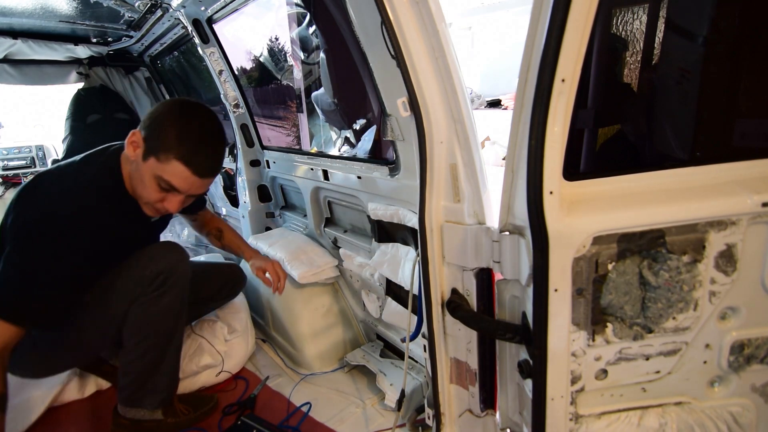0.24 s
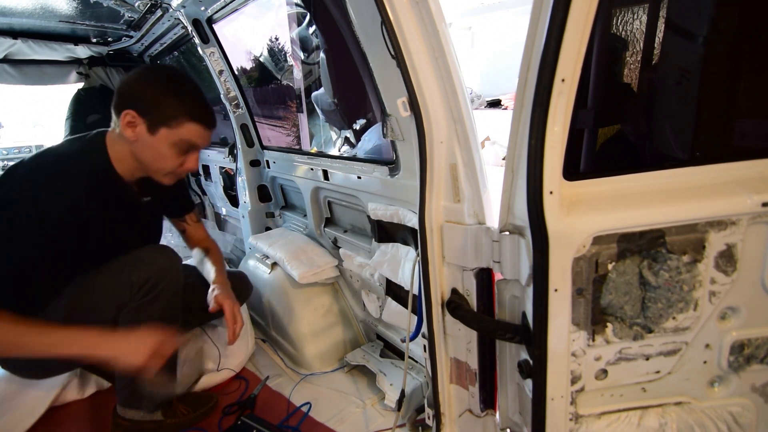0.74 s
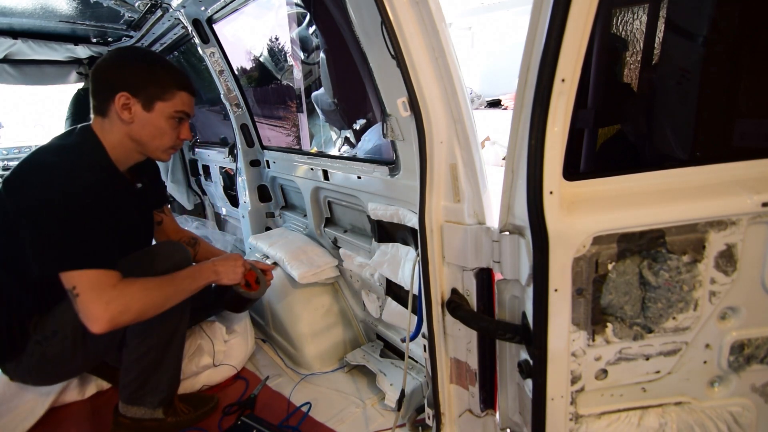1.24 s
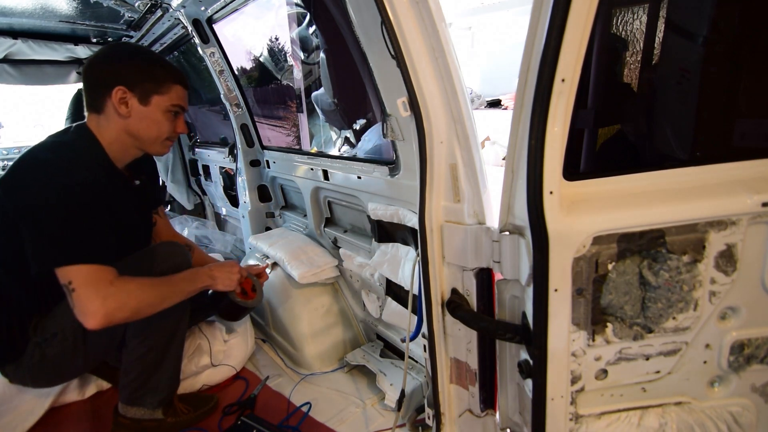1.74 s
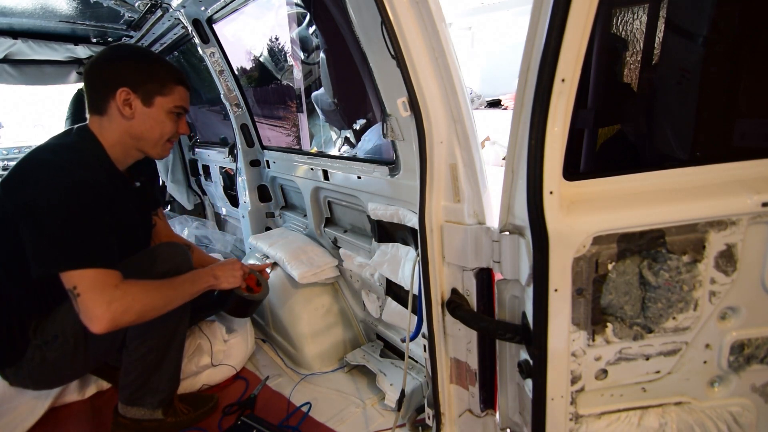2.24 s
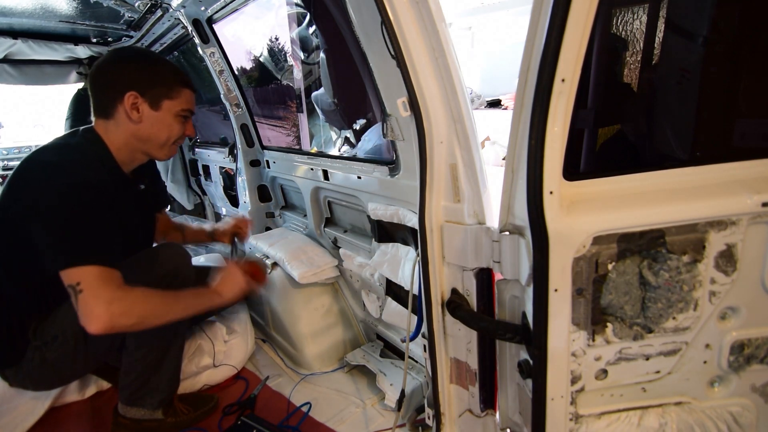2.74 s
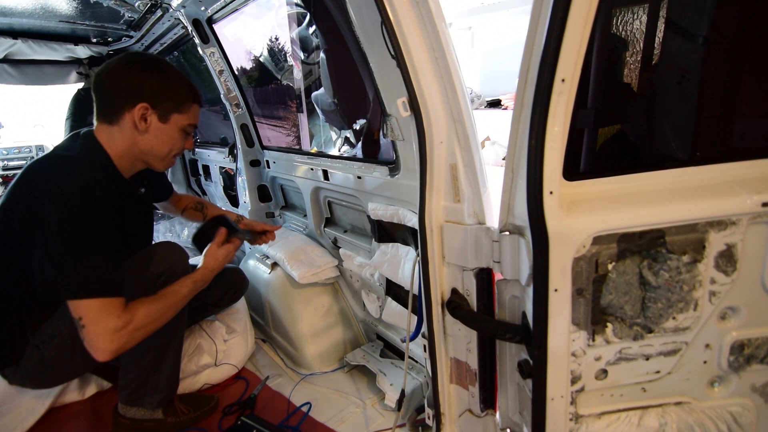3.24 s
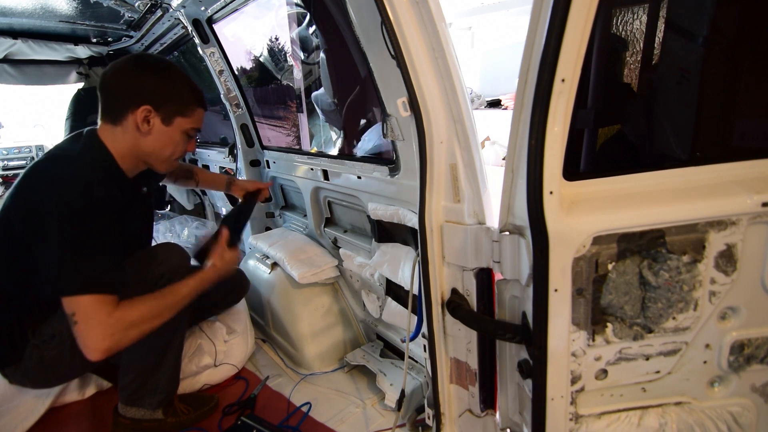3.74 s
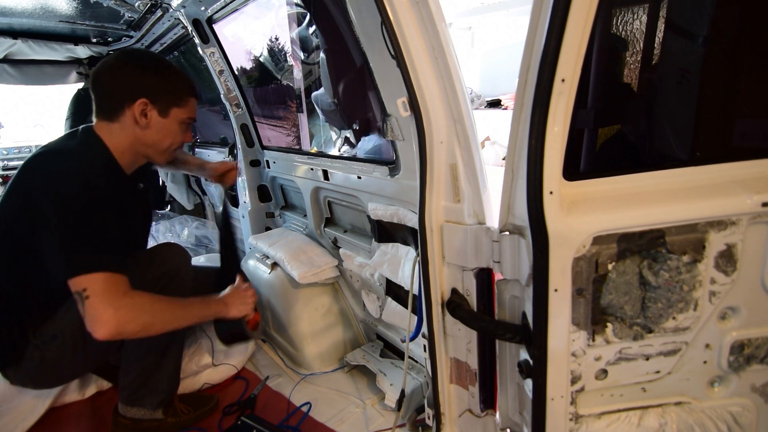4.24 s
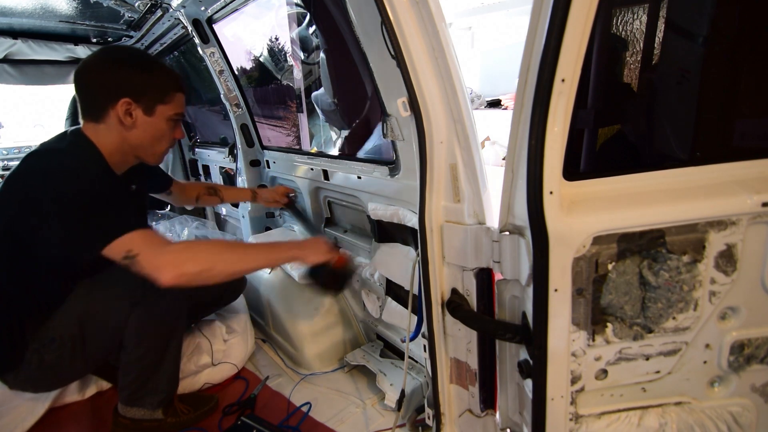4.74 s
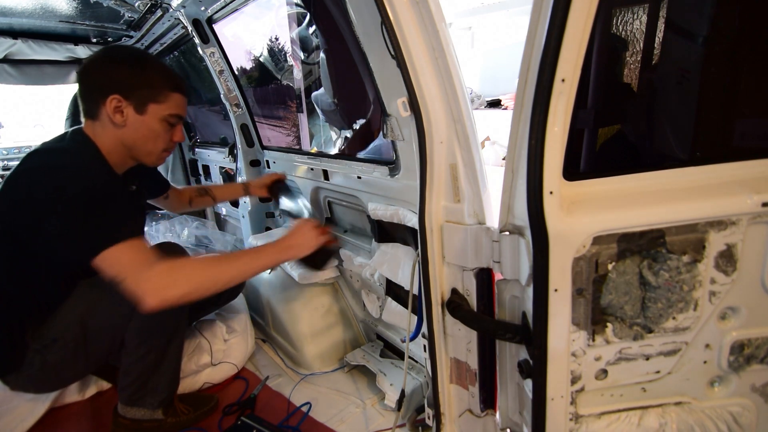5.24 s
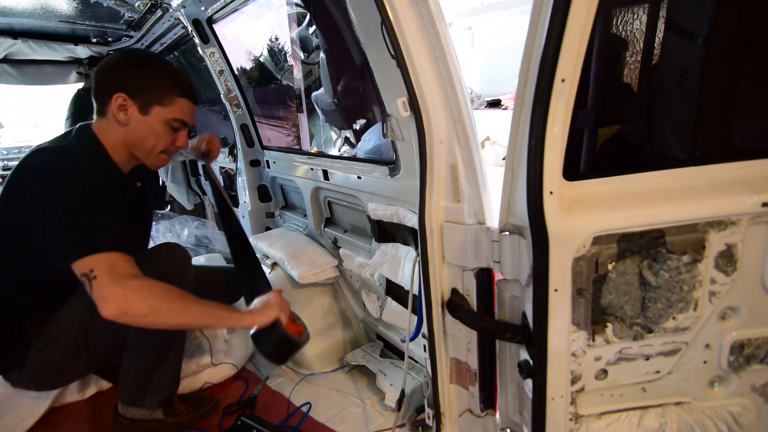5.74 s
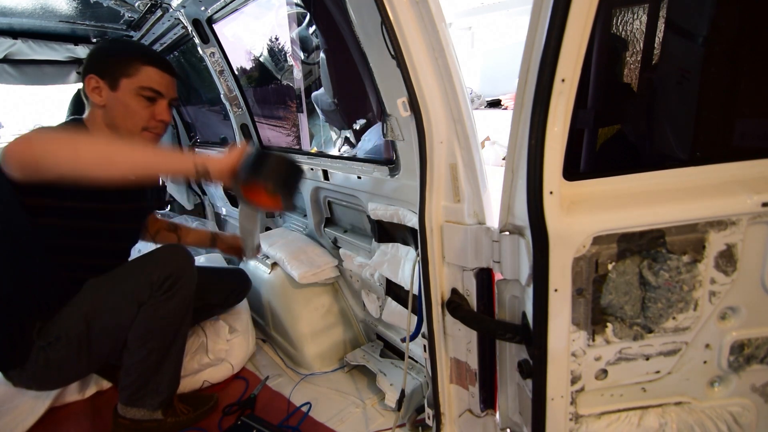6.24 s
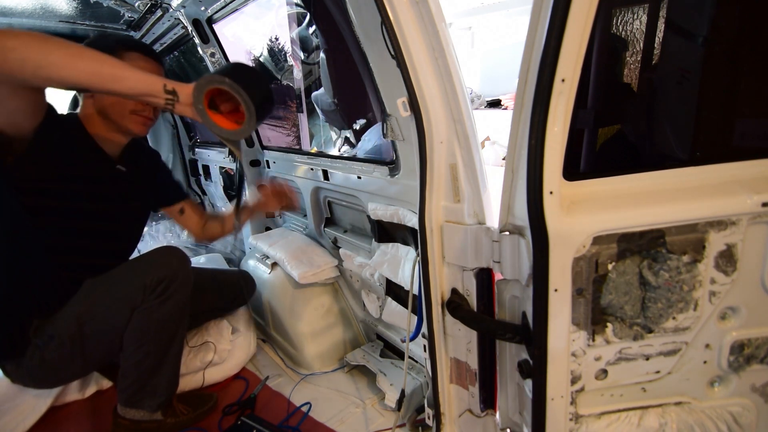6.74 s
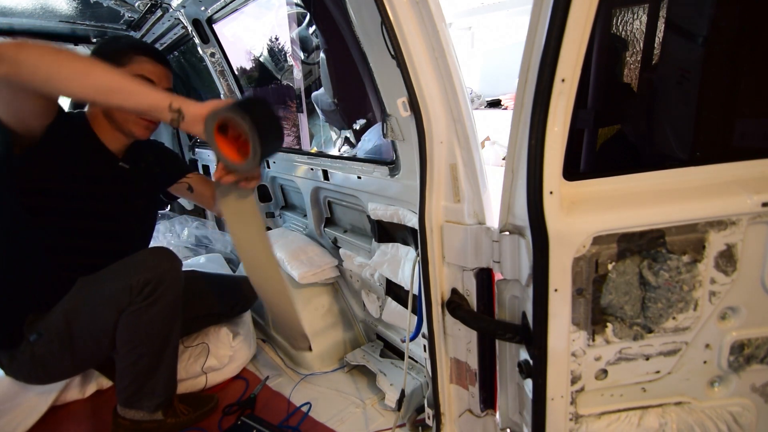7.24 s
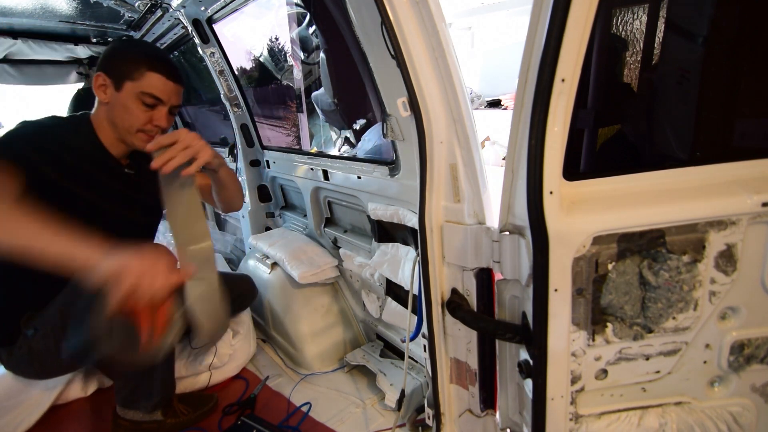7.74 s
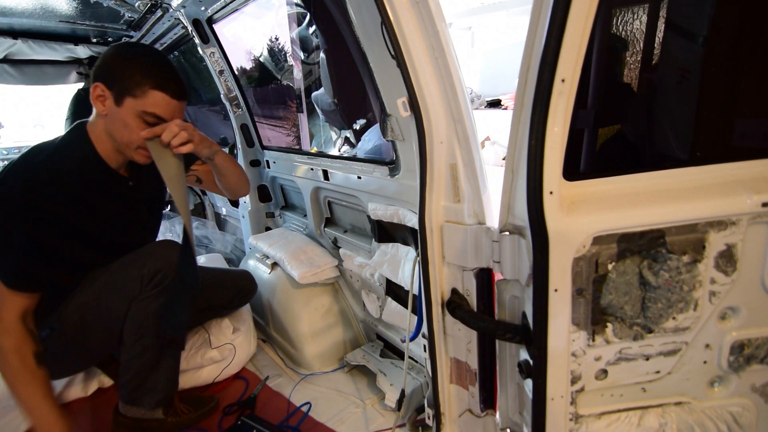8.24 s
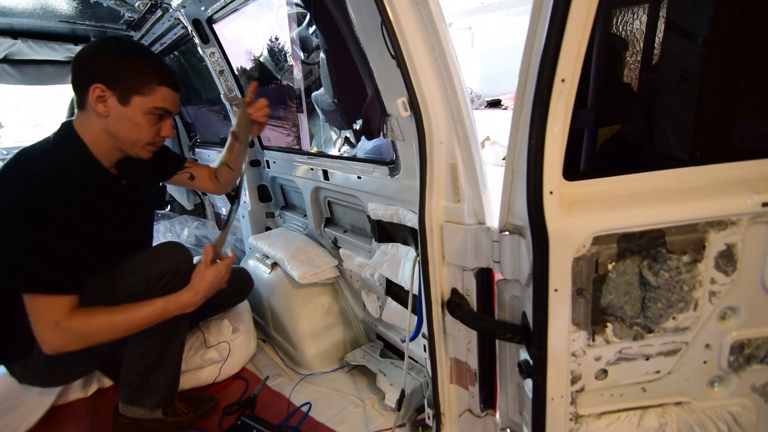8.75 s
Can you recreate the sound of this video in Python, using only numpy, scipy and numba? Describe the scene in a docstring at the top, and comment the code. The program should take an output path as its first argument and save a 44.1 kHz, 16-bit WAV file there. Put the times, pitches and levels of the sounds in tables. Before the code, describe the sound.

Quiet low rumble and hum, slight bare-shell ring. Small dry picking clicks come first, then a loud snap of tape. Brief bursts of peeling adhesive follow, each ending in a loose flutter, with sharp cracks and grainy hand sliding between. A short coarse rip cuts the strip. Right after, several quick damped metallic thuds from the dropped roll, and more crinkling. Heard close up, in stereo.

```python
"""A stripped van with a motor humming faintly nearby: feet and hands stir, then a nail picks at a roll of duct tape.
From 2.7 s four jerky tugs pull off a strip: glue snaps in a crackle, the taut strip squawks, then flaps slack.
Between tugs it crinkles in sharp cracks with a brief flutter, and sliding hands add grainy hiss and a dull rub.
At 7.6 s the strip is ripped across, thread after thread. From 8.2 s the dropped roll bounces on the sheet-metal
floor in damped notes, clacks and panel rattle, and the tape crinkles on. The bare shell rings on faintly."""
import sys
import numpy as np
from scipy import signal
from scipy.fft import rfft, irfft, next_fast_len
from scipy.io import wavfile
from scipy.ndimage import uniform_filter1d
from numba import njit

SR = 44100
rng = np.random.default_rng(int(sys.argv[2]) if len(sys.argv) > 2 else 0)


def store_wav(level_fs):
    """Save 16-bit WAV to argv[1]."""
    pcm = np.round(np.clip(np.atleast_2d(level_fs), -1, 1) * 32767)
    wavfile.write(sys.argv[1], SR, pcm.T.astype(np.int16))


N = 396018
T = np.arange(N) / SR   # time axis [s]

# All levels are relative settings; spectra shape the tone.
# low rumble of the background: (frequency [Hz], density [dB per Hz])
RUMBLE_SPECTRUM = [(15, -45), (25, -14), (87, -11.5), (102, -18.5), (123, -6.5), (149, -20), (249, -26),
                   (363, -18.5), (641, -22.5), (796, -24.5), (1070, -27), (1290, -32), (1440, -29),
                   (2760, -41.5), (16000, -43.5)]
RUMBLE_DB, HUM_DB, HUM_HZ = -56.5, -54.5, 118.5
# likeness of left and right in a diffuse field: (frequency [Hz], correlation [-1 to 1])
STEREO_LIKENESS = [(60, .975), (300, .985), (640, .95), (1400, .75), (3100, 0), (7000, -.15), (15000, -.4)]
# reflections of the whole shell, and of panels close by: (frequency [Hz], density [dB per Hz])
SHELL_SPECTRUM = [(100, 9.5), (600, 2), (1600, 5.0), (3000, 7.5), (7000, -2.5), (16000, 0.5)]
PANEL_SPECTRUM = [(100, 1.5), (700, -2.0), (2000, 0), (5000, 0.5), (16000, 1.5)]
# hands and tape sliding: (time [s], half length [s], hiss level [dB], rub level [dB])
SLIDES = [(0.397, 0.16, -66, -69), (1.989, 0.053, -63.5, -68), (2.487, 0.078, -61, -83),
          (2.687, 0.083, -57, -60.5), (2.96, 0.22, -67.5, -60.5), (3.107, 0.021, -44, -46.5),
          (3.201, 0.06, -57, -74), (3.814, 0.16, -59, -67), (4.43, 0.085, -55.5, -63.5),
          (5.233, 0.054, -62, -73), (6.006, 0.14, -62, -66.5), (6.298, 0.086, -64, -55),
          (6.543, 0.2, -63.5, -59.5), (7.927, .025, -57, -52.5), (8.61, 0.1, -61, -56),
          (8.943, 0.089, -58.5, -61)]
# bright grain of a slide: (frequency [Hz], density [dB per Hz])
HISS_SPECTRUM = [(2000, -18), (3500, -5), (6000, -1), (10000, 0), (14000, 0), (16000, -2)]
# dull body of a slide: (frequency [Hz], density [dB per Hz])
RUB_SPECTRUM = [(200, -14), (400, -3), (950, 0), (1600, -3), (2300, -11), (3200, -22), (16000, -50)]
# soft taps of hand and roll: (time [s], level [dB], pitch [Hz])
TAPS = [(0.335, -45.5, 340), (4.053, -34, 874), (4.637, -38.5, 514), (6.119, -38, 256), (6.155, -35, 258),
        (6.211, -31.5, 285), (7.386, -37.5, 228)]
# blows on the floor, shifting feet then the bouncing roll: (time [s], level [dB], note [Hz], note t60 [s])
FLOOR_BLOWS = [(0.335, -38, 133, 0.19), (4.971, -44.5, 91, 0.27), (5.021, -54, 39, 0.29),
               (8.192, -13.5, 280, 0.057), (8.265, -11.5, 330, 0.055), (8.3135, -6.5, 406, 0.032),
               (8.343, -21.5, 431, 0.16), (8.405, -10.5, 339, 0.075)]
# low resonances of the floor: (frequency [Hz], level [dB], t60 before the load damps it [s])
FLOOR_MODES = [(142.6, 3.5, 0.83), (206, -2.5, 0.65), (246, -6.5, 0.74), (326, 1.5, 0.64), (449, -9, 0.3),
               (534, -6.5, 0.39), (603, -0.5, 0.18), (728, -25, 0.33), (913, -18, 0.56), (984, -13, 0.38),
               (1070, -30, 0.21), (1112, -10, 0.26), (1244, -23, 0.46), (1970, -33, 0.12)]
# panel rattle after a blow: (frequency [Hz], density [dB per Hz])
RATTLE_SPECTRUM = [(24, -53), (40, -22), (126, -3), (172, -19), (335, -6.5), (415, -5), (446, -10),
                   (593, -15), (653, -9), (771, -20.5), (1030, -23.5), (1960, -40.5), (3230, -50),
                   (5860, -55), (12000, -49), (15600, -69), (22000, -120)]
# brief clack of a blow: (frequency [Hz], density [dB per Hz])
CLACK_SPECTRUM = [(200, -11), (450, -4), (700, 2.5), (1200, -11.5), (2000, -27), (4000, -44), (16000, -52)]
# panels buzzing under a hard blow: (frequency [Hz], density [dB per Hz])
BUZZ_SPECTRUM = [(600, -27), (1800, 4), (3000, -2), (6000, -5), (11000, 2), (16000, -10)]
# a nail picks at the end of the tape: (time [s], level [dB])
PICKS = [(1.1285, -41.5), (1.268, -37), (1.348, -44), (1.5823, -33.5), (1.6944, -35.5), (1.9634, -39.5),
         (2.0052, -34.5), (2.4687, -35), (2.6726, -30.5)]
# tone of a pick: (frequency [Hz], level [dB])
PICK_SPECTRUM = [(100, -30), (2300, -30), (3500, 5), (5000, -3), (7500, 1.5), (11000, 3), (16000, -13)]
# the loudest creases popping in the tape: (time [s], level [dB], tilt [dB per octave])
CREASES = [(0.4558, -22.5, -2.2), (1.7485, -3, 2.1), (3.0412, -4.5, 0.1), (3.1159, -5.5, -4),
           (3.5408, -19.5, 1.5), (3.6516, -22, -1.5), (3.8137, -3, 2.5), (3.8185, -7, 2),
           (4.3078, -24.5, 1), (4.348, -20.5, 1), (4.4351, -10.5, -0.5), (4.5596, -15, 4),
           (4.6349, -29, -4), (4.9182, -31, -4.5), (5.789, -17.5, -3), (5.8654, -18.5, 0),
           (5.9353, -16.5, 1), (5.9566, -15, 1.5), (5.9717, -14.5, -1), (6.0252, -17.5, -.5),
           (6.0474, -16, 1), (6.0865, -15, 1.2), (6.2801, -17.5, -0.5), (6.346, -11, 0.5),
           (6.513, -7, -1.5), (7.2053, -16.5, -2), (7.435, -27, -3.5), (7.954, -17, -3),
           (8.2228, -17.5, -1.5), (8.4326, -6, -0.5), (8.545, -9, -2.2), (8.5934, -20, -5),
           (8.7711, -15.5, -1), (8.923, -9.5, -2)]
# tone of a crease: (frequency [Hz], level [dB])
CREASE_SPECTRUM = [(100, -4), (350, 5.5), (900, 5), (1800, 5), (3200, -1), (6000, 0.5), (10500, -0.5),
                   (16000, -7.5)]
# sudden slips of the peel or tear line: (time [s], level [dB], tilt [dB per octave])
SLIPS = [(2.7345, -0.5, 2), (2.743, 3.5, -1), (2.749, 3.5, -3.5), (2.789, -4.5, 3), (3.413, -9, 1.7),
         (3.422, -8.5, 1.5), (3.489, -2, -5), (4.090, -3, 0.5), (5.701, 2.5, -0.9), (7.5585, -3.5, 5),
         (7.571, -8, 0), (7.585, 1, 0), (7.591, 2.5, -5.5), (7.607, -2, 2)]
# tone of a slip: (frequency [Hz], level [dB])
SLIP_SPECTRUM = [(30, -30), (100, -12), (350, -0.5), (900, 2.5), (1600, 4.5), (3200, -1.5), (6000, 1),
                 (10500, -2), (16000, -7)]
TILT_PIVOT_HZ = 3500   # a tilt leaves the level here alone
# the slackened strip flaps: (time [s], level [dB], starting ripple pitch [Hz], thud pitch [Hz], t60 [s])
FLAPS = [(2.815, -24, 251, 144, 0.055), (3.425, -20, 370, 159, 0.052), (3.490, -19, 313, 93, 0.15),
         (4.152, -18.5, 400, 300, 0.05), (4.165, -20.5, 320, 92.5, 0.097), (5.745, -19.5, 129, 56, 0.12)]
# the taut strip squawks: (time of peak [s], level [dB], pitch at peak [Hz], glide [octaves per s], swell [s])
SQUAWKS = [(2.760, -18, 757, -10, .009), (2.782, -28, 1320, 25, .012), (3.432, -30, 815, -1, .011),
           (3.449, -29.5, 1040, 12, 0.0094), (3.490, -34, 1600, -25, 0.0062), (4.114, -24, 730, -6, .007),
           (4.167, -34, 1290, -21, 0.011), (5.718, -23, 1224, 7, 0.0039)]
# cloth and film tearing: (frequency [Hz], density [dB per Hz])
RIP_SPECTRUM = [(59, -62), (100, -6), (260, -13.5), (343, -7.5), (784, -8), (872, -4.5), (1150, -6.5),
                (1390, 0.5), (1480, -11), (1760, 0), (2170, -11), (2520, -8), (3540, -19), (6150, -7),
                (16000, -23)]
RIP_S, RIP_LENGTH_S, RIP_ATTACK_S, RIP_RELEASE_T60_S = 7.557, .053, .003, .075
RIP_DB, RIP_PEAK_S, RIP_SURGE_S, RIP_SLOWEST = -18, 7.587, .017, .38   # slowest speed as a share of the peak
THREADS_PER_S = 1050   # at peak speed
# tugs on the roll: (time [s], length [s], crackle level [dB], change over the tug [dB], tilt [dB per octave])
TUGS = [(2.734, 0.081, -32, -9.5, -0.5), (3.410, 0.081, -31, -1.5, .8), (4.089, 0.074, -29, 0, 0.1),
        (5.699, 0.047, -30, 1.5, -0.7)]
# the adhesive letting go: (frequency [Hz], density [dB per Hz])
PEEL_SPECTRUM = [(30, -24), (100, -4), (350, 2), (800, 0.5), (1300, 3.5), (2000, 2), (3000, -10), (4500, 0),
                 (6500, -5.5), (9000, -2.5), (12000, -10), (16000, -16)]
TUG_ATTACK_S, TUG_RELEASE_T60_S = 0.0017, 0.05
STALL_DB, STALL_AT, STALL_WIDTH = -6.5, 0.54, 0.15   # place and width as shares of the tug's length
CUTOFF_HZ = 16100


def from_db(db):
    """Decibels to gain."""
    return 10 ** (np.asarray(db) / 20)


def rms_one(x):
    """Scale to rms 1."""
    return x / np.sqrt(np.mean(x ** 2) + 1e-20)


def evened(x, span_s):
    """Hold the running rms at 1."""
    power = np.abs(uniform_filter1d(x ** 2, max(int(span_s * SR), 2)))
    return x / np.sqrt(power + 1e-9)


def at_hz(points, hz):
    """Read a table on a log-frequency axis."""
    f, value = np.transpose(points)
    return np.interp(np.log(hz + 1), np.log(f), value)


def add(out, s, x):
    """Mix x in at time s."""
    i = int(s * SR)
    out[..., i:i + x.shape[-1]] += x[..., :N - i]


def dying(t60):
    """An exponential decay, cut at -60 dB."""
    return from_db(-60 * T[:int(t60 * SR)] / t60)


def envelope(attack_s, length_s, release_t60):
    """Time and gain of a gesture: it rises, holds to the end of its length, then dies."""
    t = T[:int((length_s + release_t60) * SR)]
    release = from_db(-60 * np.maximum(t - length_s, 0) / release_t60)
    return t, (1 - np.exp(-t / attack_s)) * release


def coloured(x, spectrum, size=4096):
    """Causal (minimum-phase) filter with this spectrum; white noise keeps its power."""
    cepstrum = irfft(np.log(from_db(at_hz(spectrum, np.fft.rfftfreq(size, 1 / SR)))))
    # folding the cepstrum forward packs the energy at the onset
    cepstrum[1:size // 2] *= 2
    cepstrum[size // 2 + 1:] = 0
    response = irfft(np.exp(rfft(cepstrum)))
    return signal.oaconvolve(x, response / np.linalg.norm(response))[:len(x)]


def tilted(spectrum, tilt_db):
    """Brighten or dull a spectrum by so many dB per octave; the bass moves as one."""
    return [(hz, db + tilt_db * np.log2(max(hz, 900) / TILT_PIVOT_HZ)) for hz, db in spectrum]


def thinned(x, hz):
    """A narrow strip radiates no deep bass."""
    return signal.sosfilt(signal.butter(2, hz, "high", fs=SR, output="sos"), x)


def noise(spectrum):
    """Coloured noise of about rms 1."""
    return coloured(rng.standard_normal(N), spectrum)


def snaps(per_s, spread_db):
    """Random clicks of uneven size and either sign."""
    n = len(per_s)
    sizes = from_db(spread_db * np.minimum(rng.exponential(1, n), 4))
    signs = rng.choice([-1, 1], n)
    return sizes * signs * (rng.random(n) < per_s / SR)


@njit
def gliding_ring(x, turn, keep):
    """A resonance whose pitch moves; turn is in radians per sample, keep is the gain per sample."""
    out, state = np.zeros(len(x)), 0j
    for i in range(len(x)):
        state = state * keep * np.exp(1j * turn[i]) + x[i]
        out[i] = state.imag
    return out


def off_axis(x, lag):
    """A sound from one side reaches the right microphone lag samples after the left (before it if negative)."""
    return np.array([x, np.roll(x, lag)])


def two_ports(mid, side):
    """A diffuse field at two close microphones: alike in the bass, mostly unrelated in the treble."""
    size = next_fast_len(2 * len(mid))
    alike = np.clip(at_hz(STEREO_LIKENESS, np.fft.rfftfreq(size, 1 / SR)), -.9, .999)
    width = np.sqrt((1 - alike) / (1 + alike))
    side = irfft(rfft(side, size) * width, size)[:len(mid)]
    return np.array([mid + side, mid - side])


def echoes(t60, spectrum):
    """Stereo response of dense, dying reflections after a 0.6 ms gap."""
    fade = dying(t60) * (T[:int(t60 * SR)] > .0006)
    fade = fade / np.linalg.norm(fade)
    return two_ports(*[coloured(rng.standard_normal(len(fade)) * fade, spectrum) for _ in range(2)])


def van(x, tail_db=-21.5, t60=0.37):
    """The bare shell rings on faintly."""
    tail = echoes(t60, SHELL_SPECTRUM)
    return x + from_db(tail_db) * signal.oaconvolve(x, tail, axes=1)[:, :N]


def scattered(x, near_db=-6.0, t60=0.055):
    """Bare panels close by scatter the sound at once, differently for every position of the hands."""
    near = echoes(t60, PANEL_SPECTRUM)
    x = np.pad(x, (2, near.shape[1]))
    reflected = signal.fftconvolve(x[None], near, axes=1)[:, :len(x)]
    return (off_axis(x, lag=-1) + from_db(near_db) * reflected) / np.hypot(1, from_db(near_db))


def background(waver=0.033, wander_hz=1.36):
    """Low rumble and a motor hum whose pitch and level wander slowly."""
    slow = [np.interp(T, np.linspace(0, T[-1], 40), row) for row in rng.standard_normal((2, 40))]
    phase = 2 * np.pi * np.cumsum(HUM_HZ + wander_hz * slow[0]) / SR
    hum = np.sqrt(2) * np.sin(phase) * (1 + waver * slow[1])
    rumble = two_ports(noise(RUMBLE_SPECTRUM), noise(RUMBLE_SPECTRUM))
    return from_db(HUM_DB) * off_axis(hum, lag=4) + from_db(RUMBLE_DB) * rumble


def handling(hiss_db=0., rub_db=0.):
    """Fingers, cloth and tape slide over each other: a dull rub, and a hiss of many tiny grains."""
    hiss_gain, rub_gain = np.zeros(N), np.zeros(N)
    for s, half, hiss_level, rub_level in SLIDES:
        swell = np.exp(-((T - s) / half) ** 2)
        hiss_gain += from_db(hiss_level + hiss_db) * swell
        rub_gain += from_db(rub_level + rub_db) * swell
    grains = [rms_one(snaps(np.full(N, 5000.), spread_db=2.5)) for _ in range(2)]
    return two_ports(*[hiss_gain * coloured(g, HISS_SPECTRUM) + rub_gain * noise(RUB_SPECTRUM) for g in grains])


def taps(t60=0.0081, rise_s=0.0007, level_db=9.5):
    """Soft touches, each one short damped note."""
    out, fade = np.zeros(N), dying(t60)
    t = T[:len(fade)]
    for s, db, hz in TAPS:
        add(out, s, from_db(db + level_db) * fade * (1 - np.exp(-t / rise_s)) * np.sin(2 * np.pi * hz * t))
    return out


def buzzes(buzz_db=-36.5, t60=.12, growth=2.3):
    """Loose panels buzz briefly, growing by more than one dB for each dB of the blow."""
    out, fade, hardest_db = np.zeros(N), dying(t60), max(row[1] for row in FLOOR_BLOWS)
    for s, db, _, _ in FLOOR_BLOWS:
        strength = from_db(buzz_db + growth * (db - hardest_db))
        add(out, s, strength * fade * rng.standard_normal(len(fade)))
    return off_axis(coloured(out, BUZZ_SPECTRUM), lag=2)


def floor_blows(note_db=4.5, modes_db=-17.0, rattle_db=-9.0, rattle_t60=0.34, clack_db=-14.0, clack_t60=0.066):
    """Each blow gives a damped note and a brief clack, rings the floor's low modes and rattles the panels."""
    out, rattle = np.zeros(N), np.zeros(N)
    rattle_fade, clack_fade = dying(rattle_t60), dying(clack_t60)
    for s, db, note_hz, note_t60 in FLOOR_BLOWS:
        note_fade = dying(note_t60)
        t = T[:len(note_fade)]
        note = note_fade * (1 - np.exp(-t / 0.0014)) * np.sin(2 * np.pi * note_hz * t)
        add(out, s, from_db(db + note_db) * note)
        clack = coloured(clack_fade * rng.standard_normal(len(clack_fade)), CLACK_SPECTRUM)
        add(out, s, from_db(db + clack_db) * clack)
        add(rattle, s, from_db(db + rattle_db) * rattle_fade * rng.standard_normal(len(rattle_fade)))
        for hz, mode_db, t60 in FLOOR_MODES:
            ring = dying(min(t60, .42))   # the load on the floor damps long rings
            strength = rng.choice([-1, 1]) * from_db(db + mode_db + modes_db + rng.normal(0, 0.96))
            add(out, s, strength * ring * np.sin(2 * np.pi * hz * T[:len(ring)]))
    return off_axis(out + coloured(rattle, RATTLE_SPECTRUM), lag=2)


def small_creases(db=-33., spread_db=2., tilt_db=0., count=1):
    """Every slide of the hands pops a faint crease at random: rows of (time [s], level [dB], tilt [dB per octave])."""
    rows = []
    for s, half, _, _ in SLIDES:
        for when, size, colour in rng.standard_normal((count, 3)):
            rows.append((np.clip(s + half * when / 2, 0, T[-1]), db + spread_db * size, tilt_db + colour))
    return rows


def pops(rows, spectrum, level_db, flutter_t60, flutter_db):
    """A sudden release in the tape: one sharp crack, then a brief flutter of smaller clicks."""
    out = np.zeros((2, N))
    for s, db, tilt_db in rows:
        tone = tilted(spectrum, tilt_db)
        fade = dying(flutter_t60 * np.exp(rng.normal(0, .25)))
        flutter = snaps(np.full(len(fade), 20000.), spread_db=2.) * fade
        flutter = from_db(flutter_db) * flutter / (np.linalg.norm(flutter) + 1e-9)
        burst = np.r_[1, flutter, np.zeros(256)]
        # the filter evens out level, so the spectrum's own strength is put back
        gains = from_db(db + level_db + at_hz(tone, np.linspace(0, SR / 2, 200)))
        strength = np.sqrt(np.mean(gains ** 2))
        add(out, s, scattered(strength * coloured(burst / np.linalg.norm(burst), tone)))
    return out


def flaps(sag_s=0.083, ripple_db=-6.5, thud_db=-0.5):
    """When a tug stops the strip slackens: a loose thud, with uneven ripples that sink in pitch and die sooner."""
    out = np.zeros(N)
    keep = np.exp(-np.pi * 130 / SR)   # 130 Hz wide resonance
    for s, db, ripple_hz, thud_hz, t60 in FLAPS:
        fade = dying(t60)
        t = T[:len(fade)]
        hz = ripple_hz * (1 + np.exp(-t / sag_s)) / 2
        ripple = evened(gliding_ring(rng.standard_normal(len(t)), 2 * np.pi * hz / SR, keep), 0.0076)
        thud = np.sin(2 * np.pi * thud_hz * t)
        wobble = from_db(thud_db) * thud + from_db(ripple_db) * np.sqrt(fade) * ripple
        onset = 1 - np.exp(-t / 0.00075)
        add(out, s, thinned(from_db(db) * fade * wobble * onset, .5 * thud_hz))
    return out


def rip(jitter=0.28, film_db=-0.5, rate_follows=.25):
    """Cloth threads break one after another while the plastic film splits between them; speed sets level and rate."""
    t, gain = envelope(RIP_ATTACK_S, RIP_LENGTH_S, RIP_RELEASE_T60_S)
    # the rip speeds up to its peak, then eases as it nears the far edge
    surge = np.exp(-((RIP_S + t - RIP_PEAK_S) / RIP_SURGE_S) ** 2)
    speed = gain * (RIP_SLOWEST + (1 - RIP_SLOWEST) * surge)
    n, out = len(t), np.zeros((2, N))
    per_s = THREADS_PER_S * speed ** rate_follows
    unevenness = rms_one(uniform_filter1d(rng.standard_normal(n), size=60))
    threads_crossed = np.cumsum(per_s * np.exp(jitter * unevenness)) / SR
    threads = np.diff(np.floor(threads_crossed), prepend=0) * from_db(rng.normal(0, 3.7, n))
    film = snaps(12 * per_s, spread_db=0.0)
    tearing = evened(evened(threads, 0.0037) + from_db(film_db) * evened(film, 0.0087), 0.017)
    add(out, RIP_S, scattered(coloured(from_db(RIP_DB) * speed * tearing, RIP_SPECTRUM)))
    return out


def glue(n, snaps_per_s=5500., spread_db=7.0, stutter_db=2.):
    """Glue threads snapping by the thousand, in a stutter of sticking and slipping."""
    stutter = rms_one(uniform_filter1d(rng.standard_normal(n), size=130))
    return evened(snaps(np.full(n, snaps_per_s), spread_db) * from_db(stutter_db * stutter), .01)


def squawks(width_hz=105.0, ring_db=1.5, release_share=0.57):
    """The snapping glue shakes the free strip: its ring swells, glides with the tension and breaks off."""
    out = np.zeros((2, N))
    keep = np.exp(-np.pi * width_hz / SR)
    for s, db, hz, glide, swell_s in SQUAWKS:
        t = np.arange(-2 * swell_s, 2 * swell_s, 1 / SR)   # zero at the peak
        gain = np.exp(-(t / np.where(t < 0, swell_s, release_share * swell_s)) ** 2)
        ring = gliding_ring(glue(len(t)), 2 * np.pi * hz * 2 ** (glide * t) / SR, keep)
        ring = evened(thinned(ring, 0.62 * hz), 0.0045)
        add(out, s + t[0], scattered(from_db(db + ring_db) * gain * ring))
    return out


def tugs(crackle_db=0.):
    """Each tug peels in two surges with a stall between them; the crackle follows the pull."""
    out = np.zeros((2, N))
    for s, length_s, db, change_db, tilt_db in TUGS:
        t, gain = envelope(TUG_ATTACK_S, length_s, TUG_RELEASE_T60_S)
        progress = np.minimum(t / length_s, 1)
        stall_db = STALL_DB * np.exp(-((progress - STALL_AT) / STALL_WIDTH) ** 2)
        pull_db = db + change_db * (progress - .5) + stall_db
        crackle = glue(len(t)) * gain * from_db(pull_db + crackle_db)
        add(out, s, scattered(coloured(crackle, tilted(PEEL_SPECTRUM, tilt_db))))
    return out


def scene():
    """Tape, roll and body sounds in the van, over the background."""
    picks = [(s, db, 0) for s, db in PICKS]
    tape = tugs() + squawks() + off_axis(flaps(), lag=-1) + rip()
    tape += pops(SLIPS, SLIP_SPECTRUM, level_db=0., flutter_t60=0.0049, flutter_db=1.5)
    tape += pops(CREASES + small_creases(), CREASE_SPECTRUM, level_db=-0.5, flutter_t60=0.019, flutter_db=3.5)
    tape += pops(picks, PICK_SPECTRUM, level_db=13., flutter_t60=0.02, flutter_db=8.0)
    return van(tape + taps() + floor_blows() + buzzes()) + handling() + background()


def record(dry):
    """The top is cut steeply."""
    return signal.sosfilt(signal.ellip(10, .2, 80, CUTOFF_HZ, fs=SR, output="sos"), dry)


dry = scene()
out = record(dry)
store_wav(out)
```